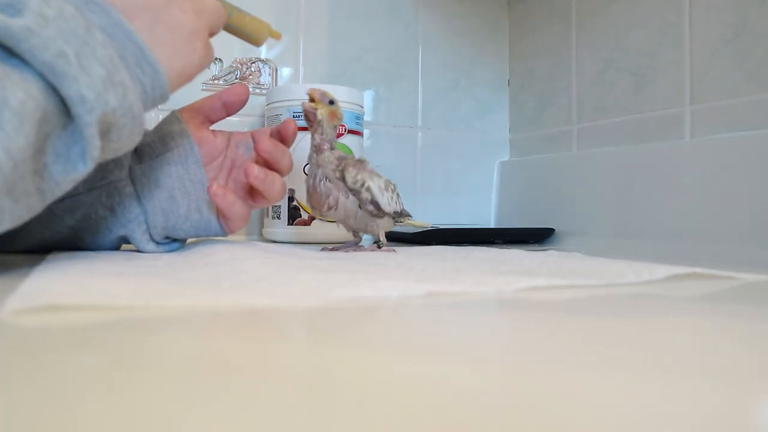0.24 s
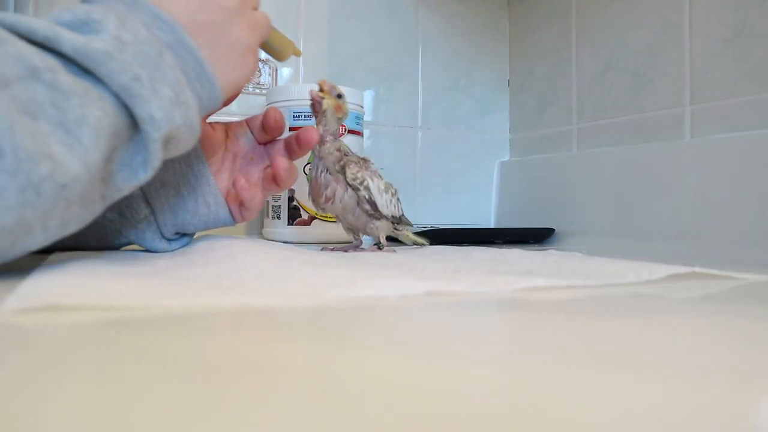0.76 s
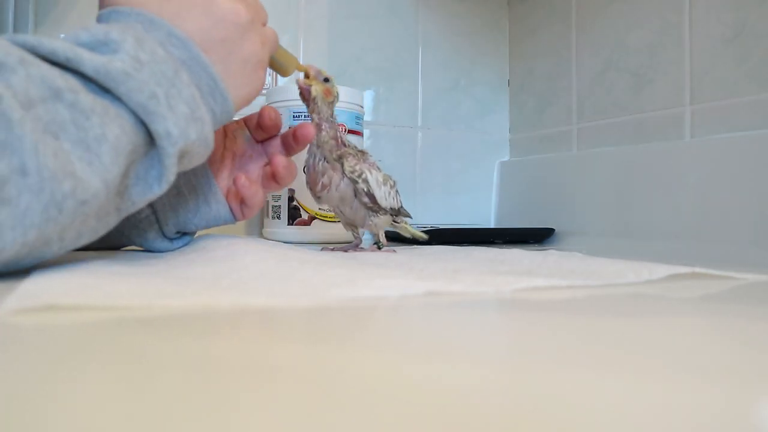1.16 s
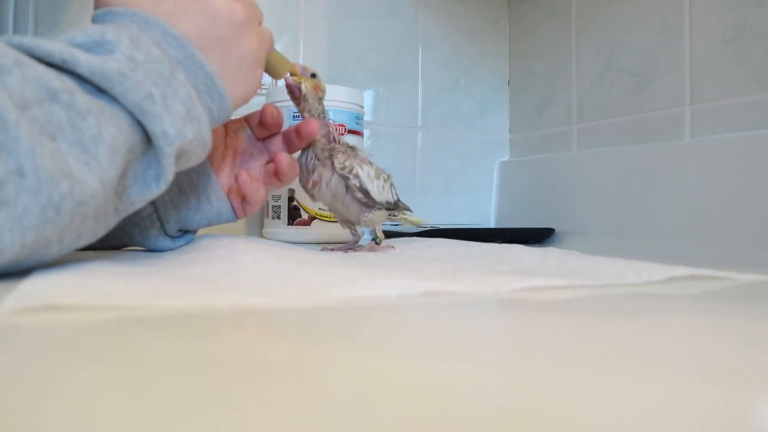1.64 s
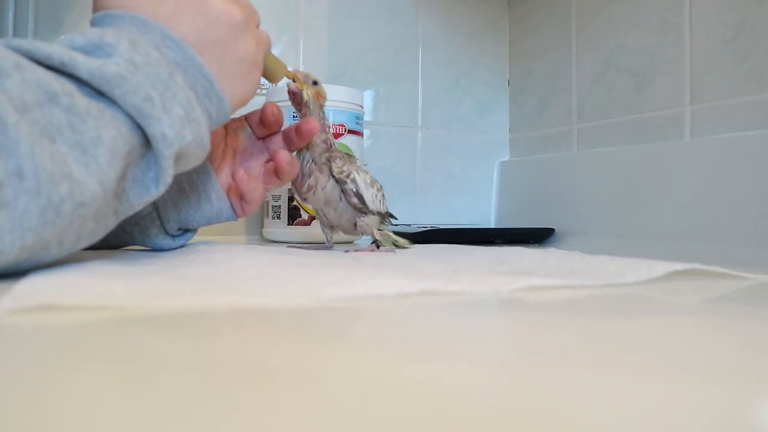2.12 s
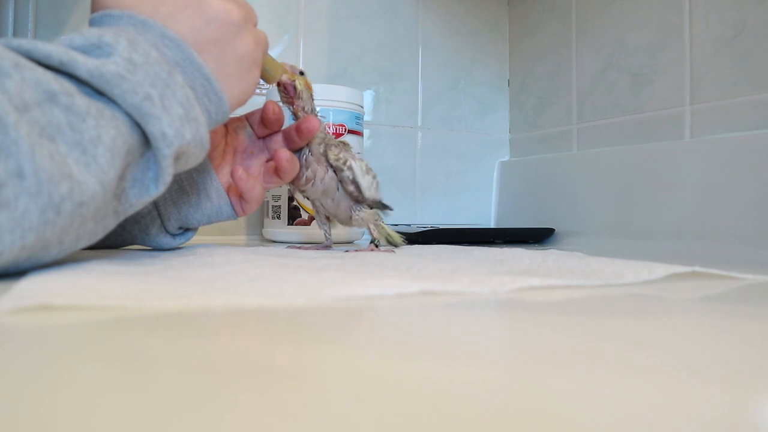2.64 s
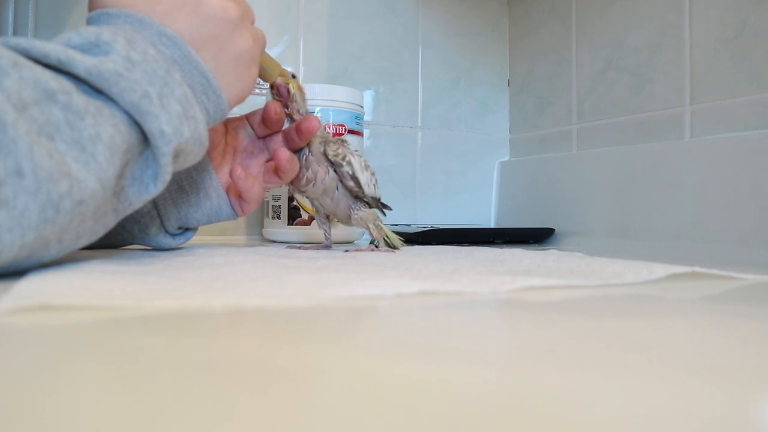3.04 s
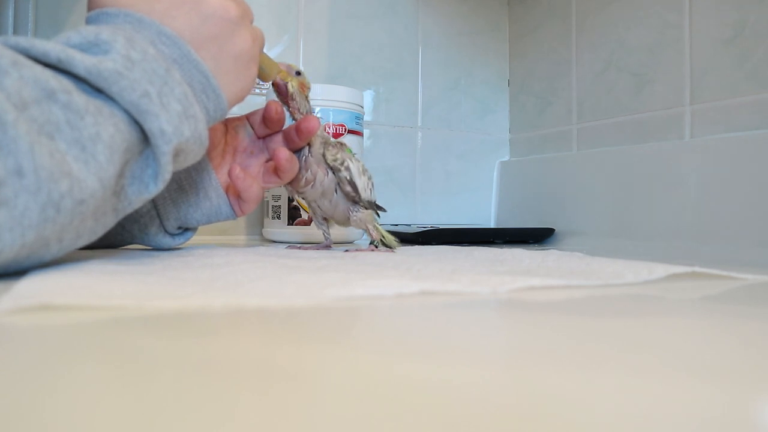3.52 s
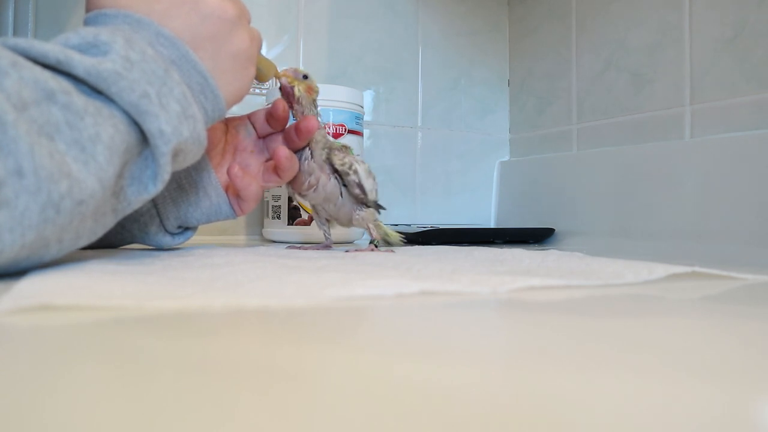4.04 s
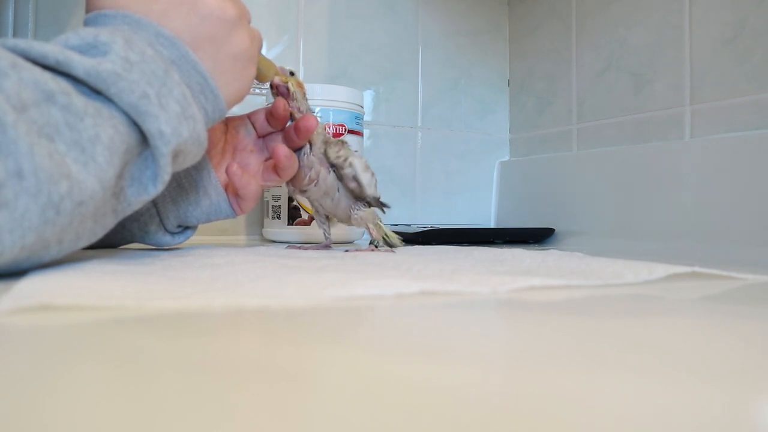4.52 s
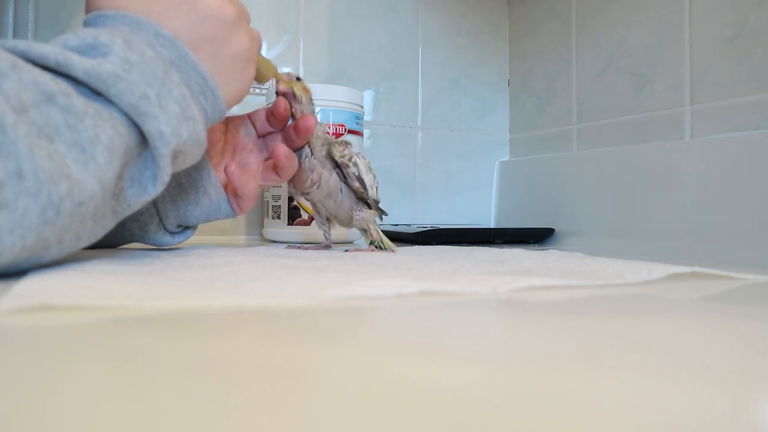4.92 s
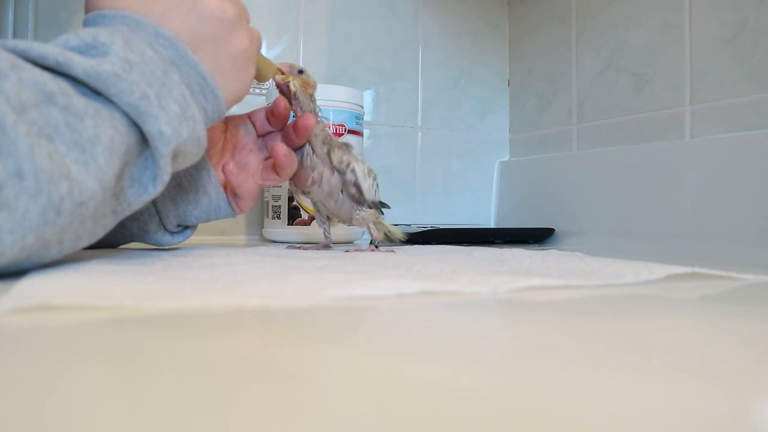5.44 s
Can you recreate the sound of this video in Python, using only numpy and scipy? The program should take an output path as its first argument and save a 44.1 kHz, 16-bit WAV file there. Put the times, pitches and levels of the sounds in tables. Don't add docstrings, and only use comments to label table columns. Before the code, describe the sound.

A baby parrot begs with three long raspy hisses, then peeps, clicks and smacks wetly while swallowing from a spoon in a tiled kitchen.

```python
import sys
import numpy as np
from scipy import signal
from scipy.fft import rfft, irfft, next_fast_len
from scipy.io import wavfile
from scipy.ndimage import uniform_filter1d

SR = 44100
rng = np.random.default_rng(int(sys.argv[2]) if len(sys.argv) > 2 else 0)


def undo_db(level):
    steps = np.asarray(level, float) / 20
    return 10 ** steps


def file_out(sig):
    cols = np.atleast_2d(sig).T
    lim = np.clip(cols, -1, 1)
    pcm = np.round(lim * 32767).astype(np.int16)
    wavfile.write(sys.argv[1], SR, pcm)


N = 250047


def evened(x):
    return x / np.sqrt(np.mean(x ** 2) + 1e-20)


def read(points, hz):
    f, value = np.transpose(points)
    return np.interp(np.log(hz + 1), np.log(f + 1), value)


def colour(x, points):
    size = next_fast_len(len(x))
    gain = undo_db(read(points, np.fft.rfftfreq(size, 1 / SR)))
    return irfft(rfft(x, size) * gain, size)[:len(x)]


def add(mix, s, sound):
    part = mix[round(s * SR):][:len(sound)]
    part += sound[:len(part)]


def resonate(x, hz, width):
    turn = np.exp(2j * np.pi * np.cumsum(hz * np.ones(len(x))) / SR)
    r = np.exp(-np.pi * width / SR)
    once = signal.lfilter([1 - r], [1, -r], x / turn + 1e-18)
    twice = signal.lfilter([1 - r], [1, -r], once)
    return 2 * (turn * twice).real


def modes(x, table):
    size = next_fast_len(N)
    f = np.fft.rfftfreq(size, 1 / SR)
    power = sum(undo_db(2 * db) / (1 + ((f - hz) / w) ** 2) ** 4 for hz, w, db in table)
    return evened(irfft(rfft(x, size) * np.sqrt(power), size)[:N])


def smooth_noise(size):
    return evened(uniform_filter1d(rng.standard_normal(N), size=size))


# (frequency [Hz], level per Hz [dB])
ROOM_TONE = [(12, -34), (20, 0.5), (54, -2.5), (76, -18.5), (128, -2.5), (169, -13), (302, -12.5),
             (347, -19.5), (620, -18.5), (674, -20.5), (774, -26), (1350, -28.5), (2340, -33),
             (4690, -37.5), (15000, -67.5)]
# (frequency [Hz], difference minus sum [dB])
ROOM_TONE_SIDE = [(60, -24), (110, -17.5), (200, -5.5), (380, -4), (700, -2), (1290, 6), (2380, 5),
                  (4400, 6.5), (8120, 7.5), (15000, -1)]
# (frequency [Hz], width [Hz], level [dB])
DRONES = [(26, 18, -65.5), (45.4, 19, -47.5), (121.7, 7.3, -51)]


def hum():
    shared, differing, motor = rng.standard_normal((3, N))
    tone = colour(shared, ROOM_TONE)
    scale = undo_db(-46) / np.std(tone)
    drones = sum(undo_db(db) * evened(resonate(motor, hz, w)) for hz, w, db in DRONES)
    side = scale * colour(colour(differing, ROOM_TONE), ROOM_TONE_SIDE)
    return scale * tone + drones, side


def rattle(start, length, gap, db, hz):
    times = np.arange(0, length, gap)
    return [(start + s, db - 3 * (k % 2), hz, .007) for k, s in enumerate(times)]


# (time [s], peak
# [dB], centre [Hz], 60 dB decay [s])
CLICKS = [(0, -35, 1650, 0.17), (1.106, -19, 1400, 0.012), (1.117, -25, 1450, 0.026),
          (2.0188, -21, 1000, 0.0078), (0, -40, 3150, .2), (0, -41, 4700, .2), (0, -43, 6300, .25),
          (2.1375, -18, 1900, 0.007), (2.153, -24, 2300, .01), (2.927, -17, 1800, .006),
          (2.9275, -26, 3900, 0.006), (3.0011, -45, 8500, 0.02), (3.0115, -50, 8000, 0.009),
          (3.229, -19, 2200, 0.016), (3.382, -29, 4200, .006), (3.396, -25, 1300, .005),
          (3.4, -27, 9000, 0.02), (3.404, -30, 13000, .006), (3.4025, -16, 2800, .006),
          (3.5325, -22, 1300, 0.006), (3.578, -26, 2450, 0.014), (3.6485, -31, 1700, 0.005),
          (3.7045, -22, 1600, 0.007), (3.7265, -24, 2500, 0.014), (3.8, -27, 2000, 0.008),
          (3.848, -35, 2300, 0.0073), (4.029, -37, 3170, 0.0068), (4.2118, -48, 6860, 0.0087),
          (4.214, -37, 1700, .006), (4.527, -38, 1890, 0.0076), (4.555, -27, 3120, 0.0087),
          (4.6165, -31, 2000, 0.006), (4.7775, -33, 1420, 0.0065), (5.0475, -34, 1700, 0.0095),
          (5.331, -41, 2000, .008), (5.5158, -24, 1600, 0.006),
          (1.108, -15.5, 3430, 0.049),
    (2.0185, -21, 340, 0.04),
    (2.0188, -17, 4760, 0.007),
    (2.0188, -27.5, 6530, 0.0092),
    (2.928, -27, 5800, 0.0093),
    (2.964, -28, 2000, 0.0071),
    (3.5335, -25, 5200, 0.012),
          (2.9125, -24, 2400, .006), (2.917, -25, 1300, .005), (2.9198, -23, 1200, .005),
          (2.9243, -21, 1900, .006), (3.212, -36, 2300, .005), (3.0915, -13, 2300, .012),
          (3.2395, -18, 2200, .012), (3.2435, -21, 1200, .008), (3.251, -22, 2900, .01),
          (3.5395, -33, 2300, .01), (3.564, -33, 2600, .02), (3.5865, -29, 2300, .012),
          (4.105, -33, 4300, .03), (4.109, -33, 5800, .04), (4.13, -28, 2200, .018),
          (4.137, -27, 2500, .016), (4.1465, -28, 2450, .016), (4.16, -28, 2500, .012),
          (4.428, -33, 4300, .06), (4.48, -35, 2600, .04), (5.237, -25, 2400, .008),
          (5.293, -41, 2500, .015), (4.169, -29, 3100, .012), (4.1835, -34, 3000, .01),
          (5.005, -41, 2000, .012), (5.09, -48, 7000, .06), (5.18, -39, 1800, .03),
          (5.556, -29, 1700, .008), (5.6675, -32, 3000, .01)]
# (start [s], length [s], gap between clicks [s], peak [dB], centre [Hz])
RATTLES = [
    (4.392, .02, .017, -32, 2300),
    (4.4287, .015, .013, -21, 2300),
    (4.4545, .008, .0055, -23, 2300),
    (4.911, .03, .009, -26, 2700),
    (5.2215, .012, .008, -28, 2400),
    (5.605, .008, .006, -31, 1700),
]


def clicks():
    out, t = np.zeros(N), np.arange(2500) / SR
    hits = CLICKS + sum((rattle(*row) for row in RATTLES), [])
    for s, db, hz, t60 in hits:
        blow = rng.standard_normal(2500) * undo_db(-60 * t / max(t60, .003))
        blow[0] += 9.9
        ring = resonate(blow, hz, 250 + 0.3 * hz)
        wide = resonate(resonate(blow, 2200, 2900), 2200, 2900)
        sound = ring + 0.4 * wide
        add(out, s, undo_db(db - 1) * sound / abs(sound).max())
    return out


def breath_curve(start, rise, fall, peak_db, beak_hz):
    beak_db = -4 + 7.5 * (beak_hz - 3380) / 1000
    swell = [(0, -10), (rise, 0), (rise + fall, -15)]  # (s, dB under the peak)
    return [(start + s, peak_db + db, beak_hz, beak_db) for s, db in swell]


# (time [s], effort [dB], beak resonance [Hz], beak opening [dB])
RASPS = [
    [(.047, -29, 3160, -19), (.11, -22.5, 3870, -3.5), (.38, -22, 3860, -2), (.5, -23.5, 3820, -4),
     (.64, -23, 3760, -2.5), (.88, -24.5, 3610, -5.5), (.93, -25, 3630, -0.5), (.981, -26, 3650, 0)],
    [(1.116, -26, 3680, -1.5), (1.14, -26, 3690, -7), (1.28, -22, 3550, 1), (1.51, -25, 3380, -2.5),
     (1.62, -23.5, 3620, -0.5), (1.82, -28, 3180, -9), (1.89, -25, 3450, -1), (2.005, -31.5, 3210, -10)],
    [(2.137, -34, 2900, 0), (2.16, -33.5, 2950, -10), (2.34, -28.5, 3370, -15), (2.42, -29, 2980, -8),
     (2.62, -28.5, 3080, -6.5), (2.67, -35.5, 2880, -17.5), (2.75, -28, 3000, -6), (2.84, -35.5, 2930, -14),
     (2.922, -38, 2950, -17)],
]
# (start [s], rise [s], fall [s], peak [dB], beak resonance [Hz])
WHEEZES = [ (3.07, 0.016, 0.043, -24, 3320), (3.221, 0.032, 0.034, -31, 3230),
           (3.371, .023, 0.0029, -36, 4270), (3.534, 0.004, 0.022, -40, 3600),
           (3.558, 0.065, .024, -39, 4030), (3.715, 0.023, 0.042, -36.5, 3550),
           (3.85, 0.058, 0.0086, -42, 4040), (4.03, 0.083, 0.16, -44.5, 3760),
           (4.351, 0.046, 0.023, -47, 3460), (4.415, 0.019, 0.098, -39.5, 3500),
           (4.541, 0.015, 0.022, -50, 3300), (4.9, .018, 0.035, -39, 3000),
           (5.001, 0.041, 0.016, -53, 3410), (5.207, .025, 0.025, -40, 3060),
           (5.33, 0.033, 0.023, -41.5, 3400), (5.517, 0.012, 0.08, -41, 2770),
           (5.598, 0.019, 0.09, -44, 2600)]


def breathing(t):
    effort_db, beak_hz, beak_db, breath = np.array([[-60.], [3000], [0], [0]]) * np.ones(N)
    for curve in RASPS + [breath_curve(*row) for row in WHEEZES]:
        s, *columns = np.transpose(curve)
        now = (t >= s[0]) & (t < s[-1])
        effort_db[now], beak_hz[now], beak_db[now] = (np.interp(t[now], s, c) for c in columns)
        opening, closing = (t[now] - s[0]) / 0.0028, (s[-1] - t[now]) / 0.0018
        breath[now] = np.minimum(np.minimum(opening, closing), 1)
    return effort_db, beak_hz, beak_db, breath


def membranes(effort_db):
    slaps_per_s = np.interp(effort_db, [-42, -30], [400, 1500])
    strength = undo_db(5.1 * np.minimum(rng.exponential(1, N), 2.4))
    slaps = strength * (rng.random(N) < slaps_per_s / SR) * rng.choice([-1, 1], N)
    slaps = evened(slaps / np.sqrt(slaps_per_s))
    air = np.interp(effort_db, [-42, -30], [.6, .8])
    drive = np.sqrt(1 - air ** 2) * slaps + air * rng.standard_normal(N)
    return drive * undo_db(0.64 * smooth_noise(500))


# (frequency [Hz], width [Hz], level [dB])
CHEST = [(450, 400, -20), (750, 130, -2), (860, 150, -5), (1300, 350, -4)]
THROAT = [(1587, 170, -3), (1709, 157, 0.5), (2050, 410, -25), (2330, 245, 5), (2950, 1910, 1),
          (4300, 650, -12.5)]
HISS = [(4180, 345, 6.5), (4964, 362, 17), (5850, 1030, 2), (5970, 1180, -1), (7200, 540, -15),
        (8700, 700, -28.5)]
TOP_HISS = [(7700, 660, 2.5), (9280, 1200, -4), (10570, 280, -10), (12300, 1300, -11), (14000, 1200, -16)]
# (frequency [Hz], width [Hz], level [dB], rise per kHz of beak [dB])
NECK = [
    (1668, 414, -12, 7.5),
    (1353, 297, -9, -10.5),
]
# (time [s], level [dB])
BOBS = [(1.2, -1.5), (1.439, -4), (1.554, -13.5), (1.68, -3), (1.851, -12.5), (2.0, -8.5), (2.148, -19),
        (2.413, -15), (2.567, -10.5), (2.687, -16), (2.858, -45), (3.089, 5.5), (3.26, 5), (3.385, 17.5),
        (3.63, 8), (4.11, -3), (4.93, 5), (5.55, 6)]
# (time [s], level re effort [dB])
TOP_HISS_LEVEL = [(.05, -34.5), (.11, -34.5), (.14, -55), (.22, -44.5), (.27, -34.5), (.98, -33), (1.13, -34.5),
                  (1.28, -34.5), (1.34, -56.5), (1.54, -47), (1.59, -26.5), (1.66, -49), (1.84, -37), (1.88, -30.5),
                  (1.93, -38), (2.3, -38), (2.7, -33), (3.3, -23.5), (3.5, -43.5), (5.45, -40), (5.53, -23)]


def rasps():
    t = np.arange(N) / SR
    effort_db, beak_hz, beak_db, breath = breathing(t)
    drive = membranes(effort_db)

    beak = evened(resonate(drive, beak_hz, 1180))
    voice = 0.93 * modes(drive, THROAT) + undo_db(beak_db) * beak
    voice = voice / np.sqrt(0.29 + undo_db(2 * beak_db))

    chest_db = np.interp(effort_db, [-42, -30], [-9.5, -8])
    chest_db = chest_db - 1.5 * (t > WHEEZES[0][0])
    voice = voice + undo_db(chest_db) * modes(drive, CHEST)

    wider_khz = (np.minimum(beak_hz, 3900) - 3380) / 1000
    slack_db = np.interp(effort_db, [-34, -27], [-20, 0])
    for hz, w, db, slope in NECK:
        voice = voice + undo_db(db + slack_db + slope * wider_khz) * evened(resonate(drive, hz, w))

    hiss_db = np.interp(effort_db, [-42, -30], [-4, 2.5])
    bob_s = 0.051
    hiss_db = hiss_db + sum(db * np.exp(-((t - s) / bob_s) ** 2) for s, db in BOBS)
    voice = voice + undo_db(hiss_db) * modes(drive, HISS)
    voice = voice + undo_db(np.interp(t, *np.transpose(TOP_HISS_LEVEL))) * modes(drive, TOP_HISS)
    return voice * breath * undo_db(effort_db - 1.5)


# (centre [s], peak [dB], start pitch [Hz], end pitch [Hz], length [s])
PEEPS = [(1.132, -16, 3600, 3600, .005), (2.016, -24, 1900, 1960, .009), (2.9265, -22, 2500, 1900, .005),
         (2.930, -17, 1900, 2300, .008), (2.9372, -26, 2050, 1950, .004), (2.943, -27, 2100, 2000, .005),
         (3.127, -27, 5100, 5000, .008), (3.134, -33, 2300, 2300, .005), (3.277, -28, 2400, 2200, .005),
         (3.4015, -14.5, 2200, 2900, .0065), (3.641, -32, 2200, 2424, .004),
         (3.748, -30, 2170, 2640, 0.012), (3.767, -33, 1900, 2050, 0.008), (3.854, -55, 2000, 2050, 0.0054),
         (3.912, -31, 2160, 2326, 0.0046), (4.1203, -36, 1800, 1700, .005), (4.230, -34, 2265, 1855, .007),
         (4.563, -43, 2900, 3450, .024), (4.571, -38, 1720, 1720, 0.0055), (5.2, -45, 3050, 2830, .026),
         (5.369, -35, 1870, 1760, .008), (5.537, -30, 2720, 2600, .028), (5.582, -35, 2600, 2450, .009),
         (5.625, -37, 2350, 2100, .008), (5.639, -36, 2500, 2200, .005), (5.652, -37, 2400, 2300, .01)]
# (centre [s], peak [dB], start pitch [Hz], end pitch [Hz], length [s])
SQUAWKS = [
    (.9898, -15.5, 1560, 1700, .011),
    (3.406, -11.5, 3010, 3070, .0062),
    (3.4117, -21, 3050, 3020, .004),
]
PEEP_PARTIALS = [0, -20, -23, -36]
SQUAWK_PARTIALS = [0, -6, -7, -10]
OVERLOAD_PARTIALS = [-32, -36, -38]
# (frequency [Hz], level [dB])
BEAK_TOP = [(6800, 0), (8500, -28), (12000, -45)]


def peeps():
    out, overload = np.zeros((2, N))
    tremble = 1 + .25 * smooth_noise(150)
    for table, partials, brassy in [(PEEPS, PEEP_PARTIALS, 0), (SQUAWKS, SQUAWK_PARTIALS, 1)]:
        for s, db, start_hz, end_hz, length in table:
            u = np.linspace(0, 1, round(1.146 * length * SR))
            turn = 2 * np.pi * np.cumsum(start_hz + (end_hz - start_hz) * u) / SR
            swell = undo_db(db + 3) * np.sin(np.pi * u) ** 2
            tone = 0
            for k, k_db in enumerate(partials, 1):
                tone = tone + undo_db(k_db + read(BEAK_TOP, k * end_hz)) * np.sin(k * turn)
            upper = sum(undo_db(k_db) * np.sin((k + 3) * turn) for k, k_db in enumerate(OVERLOAD_PARTIALS))
            add(out, s - .75 * length, swell * tone)
            add(overload, s - .75 * length, brassy * swell * upper)
    return out * tremble, overload


# (time [s], pitch [Hz], level [dB])
SQUEAKS = [
    [(4.028, 3020, -43), (4.045, 3600, -54), (4.07, 3300, -44), (4.09, 3600, -52), (4.108, 3000, -42),
     (4.122, 2950, -48)],
    [(4.138, 2900, -49), (4.143, 3100, -39), (4.165, 3150, -38.5), (4.18, 3600, -42), (4.21, 3650, -47),
     (4.233, 4100, -44)],
    [(3.376, 3900, -40), (3.384, 4300, -26), (3.398, 5270, -27)],
    [(4.362, 3560, -55), (4.38, 3450, -54), (4.41, 3500, -56), (4.425, 3400, -52)],
    [(4.428, 3300, -47), (4.45, 3600, -44), (4.47, 3200, -48)],
    [(4.885, 2630, -59), (4.905, 2880, -43), (4.913, 3070, -32.5), (4.94, 3020, -48)],
    [(5.208, 3000, -47), (5.225, 3100, -38), (5.25, 3000, -43)],
    [(5.52, 2670, -36), (5.54, 2700, -42), (5.56, 2950, -50), (5.595, 2620, -48)],
]


def squeaks():
    out, air = np.zeros(N), rng.standard_normal(N)
    air = air * undo_db(2.5 * smooth_noise(130))
    width_hz = 330
    for curve in SQUEAKS:
        s, hz, db = np.transpose(curve)
        t = np.arange(s[0], s[-1], 1 / SR)
        noise = air[round(s[0] * SR):][:len(t)]
        pitch_hz = np.interp(t, s, hz)
        tone = evened(resonate(noise, pitch_hz, width_hz))
        octave = undo_db(-25) * evened(resonate(noise, 2 * pitch_hz, 2 * width_hz))
        edge = np.minimum(np.minimum(t - s[0], s[-1] - t) / 0.0017, 1)
        add(out, s[0], (tone + octave) * edge * undo_db(np.interp(t, s, db)))
    return out


# (delay [s], level [dB])
TILES = [(.0012, -10), (.0029, -12), (.0062, -12), (.011, -16), (.017, -20), (.025, -22)]
# (frequency [Hz], 60 dB decay [s])
KITCHEN = [(300, 0.81), (1500, 0.28), (3000, 0.28), (6000, 0.23), (12000, 0.29)]


def room_answer():
    size = SR // 2
    taps = np.zeros((2, size))
    at = np.arange(400, size - 20, 20) + rng.integers(0, 20, (2, (size - 401) // 20))
    np.put_along_axis(taps, at, rng.choice([-1., 1.], at.shape), 1)
    taps[1] = .5 * taps[0] + 8.2 * taps[1]
    hz, t, z = signal.stft(taps, SR, nperseg=256)
    decay = undo_db(-60 * t / read(KITCHEN, hz)[:, None])
    tail = signal.istft(z * decay, SR, nperseg=256)[1][:, :size]
    answer = undo_db(-6.5) * tail / np.linalg.norm(tail, axis=1, keepdims=True)
    port_lag = 4.6
    answer[0, 8] += 1
    answer[1, :32] += np.sinc(np.arange(32) - 8 - port_lag)
    for (s, db), (shift, skew) in zip(TILES, rng.uniform(-1, 1, (len(TILES), 2))):
        at = round(s * SR * (1 + .15 * shift))
        answer[[0, 1], [at, at + round(5 * skew)]] += undo_db(db)
    return answer


def kitchen(x):
    turn = 2 * np.pi * 1.333 * np.arange(N) / SR
    out = np.zeros((2, N))
    for k in range(3):
        share = (1 + np.cos(turn + 2 * np.pi * k / 3)) / 3
        out += signal.fftconvolve((x * share)[None], room_answer(), axes=1)[:, :N]
    return out


# (start [s], end [s], frequency [Hz], width [Hz])
BAND_GAPS = [
    (.295, .51, 5050, 950),
    (.54, .61, 5200, 600),
    (.69, .95, 4850, 450),
    (1.13, 1.33, 4830, 380),
    (1.37, 1.46, 4850, 280),
    (2.135, 2.16, 5200, 900),
    (5.525, 5.55, 4500, 300),
]


def drop_bands(x):
    hz, t, z = signal.stft(x, SR, nperseg=1024)
    for start, end, gap_hz, width in BAND_GAPS:
        z[np.ix_(abs(hz - gap_hz) < width / 2, (t > start) & (t < end))] *= undo_db(-40)
    return signal.istft(z, SR, nperseg=1024)[1][:N]


def starve(x, under_db):
    hz, t, z = signal.stft(x, SR, "cosine", nperseg=2048, noverlap=1024)
    band_hz = hz[:1024:8, None]
    band_power = (abs(z[:1024]) ** 2).reshape(128, 8, -1).mean(1)
    band_db = 10 * np.log10(band_power + 1e-20)
    top_db = band_db[6:].max(0)
    whim = uniform_filter1d(rng.standard_normal(band_db.shape), size=3, axis=1)
    whim = uniform_filter1d(whim, size=2, axis=0)
    spare_db = 2.66 * (band_hz - 4330) / 1000 + 0.68 * (top_db.max() - top_db - 13.0)
    top_hiss_db = np.interp(t, *np.transpose(TOP_HISS_LEVEL))
    spare_db = spare_db + 5.5 * evened(whim) + 0.47 * (top_hiss_db + 34)
    kept = np.clip((band_db - top_db + under_db + spare_db) / 2, 0, 1)
    kept = np.maximum(kept, band_hz < 6300)
    kept = np.vstack([np.repeat(kept, 8, axis=0), kept[-1:]])
    return signal.istft(z * kept, SR, "cosine", nperseg=2048, noverlap=1024)[1][:N]


# (frequency [Hz], level [dB])
SUM_DIP = [(4450, 0), (4720, -5), (4850, -14), (4980, -6), (5500, 0)]
# (frequency [Hz], level [dB])
WIDEN = [(200, -8), (700, 2), (1400, 2), (2400, 1.5), (4400, -4.5), (6500, 0), (9000, 14), (13000, -5)]


def scene():
    room_mid, room_side = hum()
    whistle, overload = peeps()
    left, right = kitchen(clicks() + rasps() + whistle + squeaks())
    mid = drop_bands(colour((left + right) / 2, SUM_DIP) + room_mid)
    mid = mid + overload
    side = colour((left - right) / 2, WIDEN) + room_side
    return np.array([mid + side, mid - side])


def top_cut(x):
    return signal.sosfilt(signal.butter(12, 16600, fs=SR, output="sos"), x)


def record(dry):
    mid = starve((dry[0] + dry[1]) / 2, under_db=25)
    side = starve((dry[0] - dry[1]) / 2, under_db=39.5)
    return top_cut(np.array([mid + side, mid - side]))


dry = scene()
out = record(dry)
file_out(out)
```